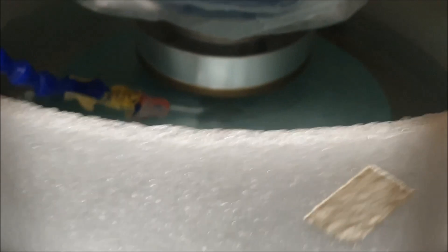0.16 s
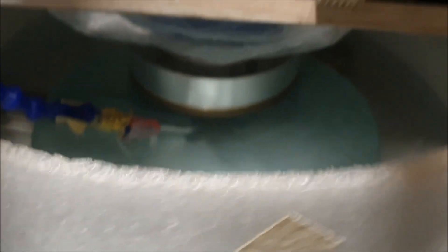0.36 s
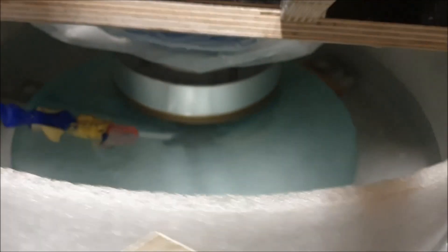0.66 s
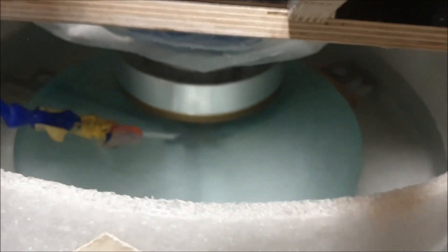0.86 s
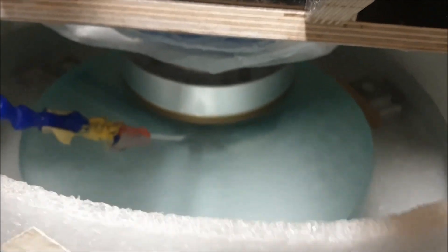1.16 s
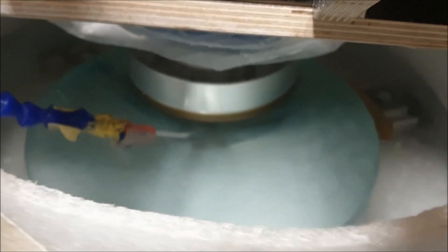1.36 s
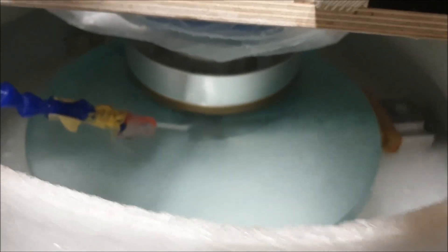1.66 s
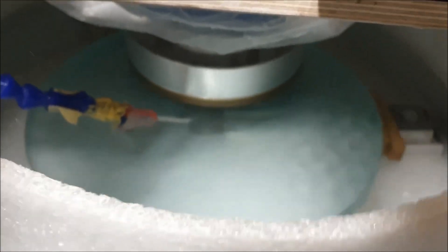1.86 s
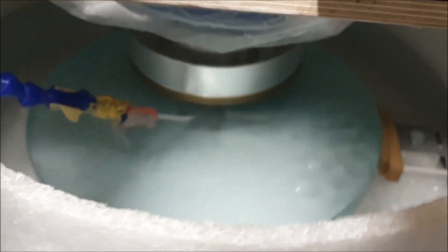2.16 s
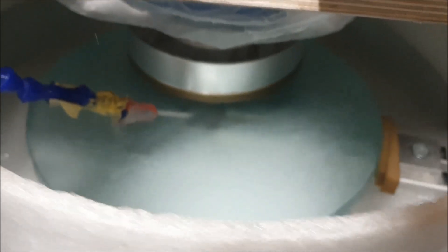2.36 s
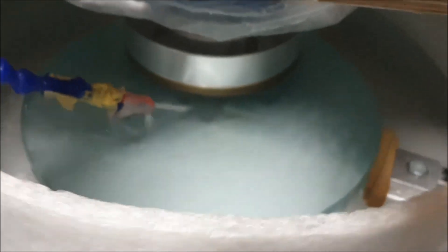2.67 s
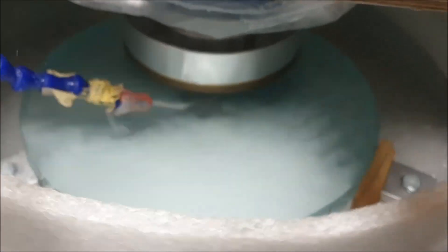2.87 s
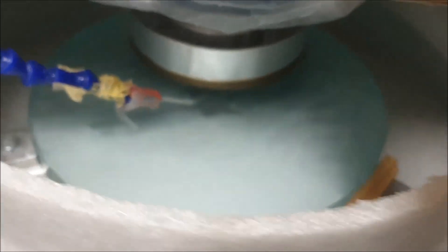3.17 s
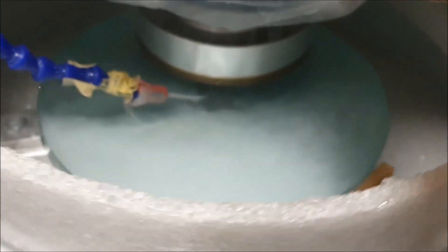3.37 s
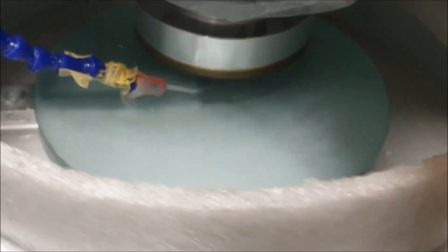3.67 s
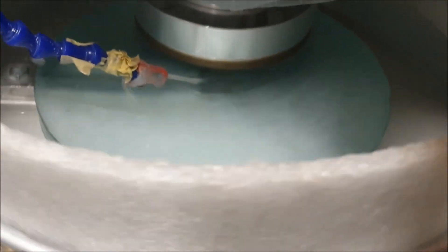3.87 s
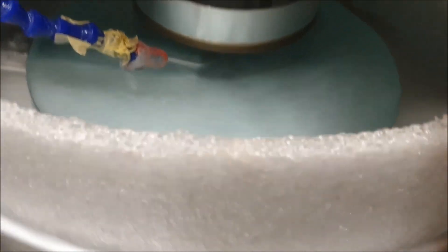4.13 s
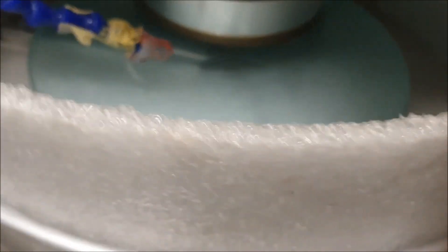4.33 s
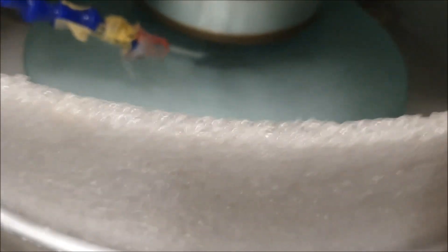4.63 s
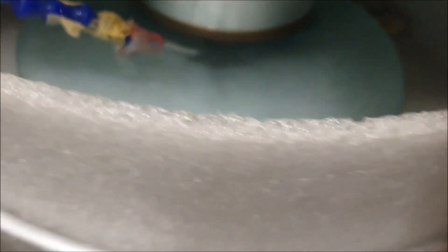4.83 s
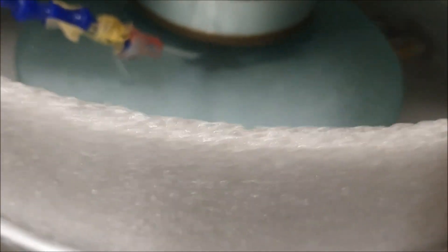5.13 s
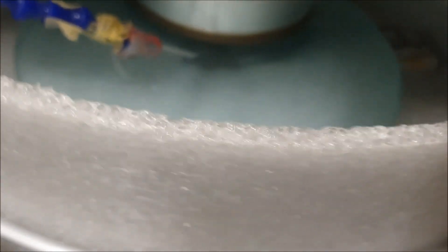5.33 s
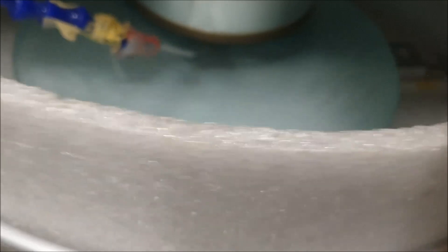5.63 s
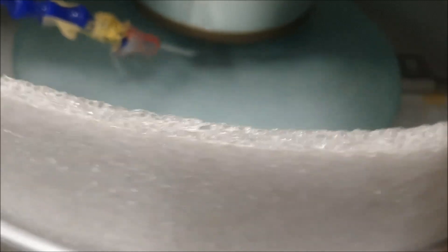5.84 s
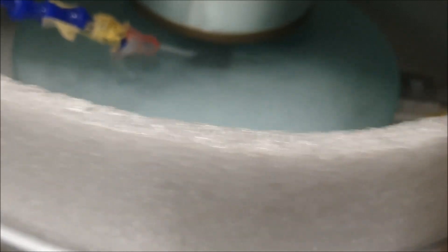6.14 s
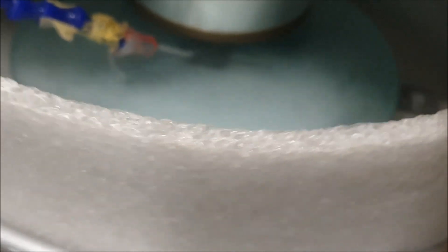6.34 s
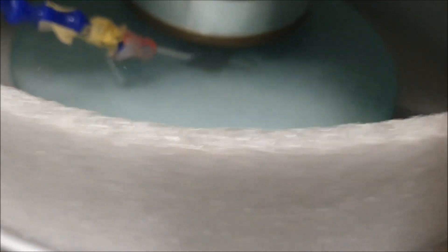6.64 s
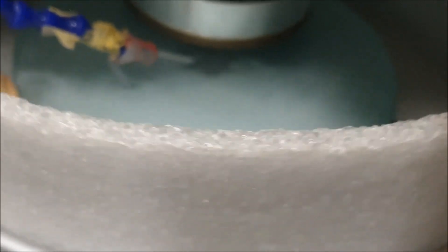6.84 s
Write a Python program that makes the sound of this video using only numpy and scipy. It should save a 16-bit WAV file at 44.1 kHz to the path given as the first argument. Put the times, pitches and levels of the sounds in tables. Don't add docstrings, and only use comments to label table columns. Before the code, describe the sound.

Close to a foam-walled tub, a spindle turns a grinding wheel against wet glass. A continuous low hum carries rapid knocks that blur into a rough buzz, with gritty hiss and metallic ringing. Irregular ticks come first, heavier thuds near two and a half seconds, drier clacking follows, then the load eases around five seconds and the rattle returns. A thin high whine stays on the left.

```python
import sys
import numpy as np
from scipy import signal
from scipy.fft import rfft, irfft
from scipy.io import wavfile
from scipy.ndimage import uniform_filter1d

SR = 44100
rng = np.random.default_rng(int(sys.argv[2]) if len(sys.argv) > 2 else 0)


def volts_from_decibels(level):
    exponent = np.asarray(level, float) / 20
    return 10 ** exponent


def log_audio(samples):
    frames = np.atleast_2d(samples).T
    limited = np.clip(frames, -1, 1)
    pcm = np.round(limited * 32767).astype(np.int16)
    wavfile.write(sys.argv[1], SR, pcm)


N = 308700
TIME = np.arange(N) / SR

# (start s, end s)
PRESS, COAST, LIFT, RETURN = (2.16, 2.83), (3.9, 5), (4.98, 5.34), (5.35, 8)
# (press_db, coast_db, lift_db, return_db)
PART_RESPONSE = [(0.28, (0.1, 1.3), (1.5, -0.5, -8.5, 2.5)), (0.22, (-6.5, 12.4), (0, 1.5, -5, 3.5)),
                 (0.17, (-8, 13), (0.5, -0.5, -14, 1.5)), (0.043, (-9, 4.1), (1, 4.5, 0, 3)),
                 (0.11, (-4, 6), (-2, -1, -17, 5)), (1, (.1, 0), (-3, 4.7, 1.5, -1)), (0.4, (-8, 6),
                 (-7, 11.5, -10, 7.5))]


def curves(table):
    s, *columns = np.transpose(table)
    return [np.interp(TIME, s, c) for c in columns]


def unit(x):
    return x / np.sqrt(np.mean(x ** 2))


def ring(x, hz, width_hz):
    return signal.lfilter(*signal.iirpeak(hz, hz / width_hz, SR), x)


def pan(db):
    return volts_from_decibels(np.array([[db], [-db]]) / 2)


def walk(rate):
    hold = int(SR / rate)
    steps = np.repeat(rng.standard_normal(N // hold + 1), hold)
    return 0.59 * uniform_filter1d(uniform_filter1d(steps, hold), hold)[:N]


def spell(start_s, end_s):
    return np.clip(np.minimum(TIME - start_s, end_s - TIME) / 0.25 + .5, 0, 1)


def spells():
    return np.array([spell(*s) for s in (PRESS, COAST, LIFT, RETURN)])


def swells(rows):
    return sum(db * spell(start_s, end_s) for start_s, end_s, db in rows)


def echoed(db, drift_db, share, cycle_s, null_s):
    share = min(share, .95)
    power = 1 + share ** 2 - 2 * share * np.cos(2 * np.pi * (TIME - null_s) / cycle_s)
    return db + drift_db * (TIME - TIME.mean()) + 10 * np.log10(power)


def hum(turns, cut):
    multiples = (2, 3, 4, 5, 6, 7, 8, 9, 10, 12)
    # level_db, drift_db_per_s, echo_share [0-1], cycle_s, null_s
    hum_echo = [(-55.21, 0.03, 0.21, 3.23, 1.7), (-56.34, 0.25, 0.45, 6.62, 0.28),
                (-53.4, 2.09, 0.93, 4.62, 3.5), (-60.07, -3.08, 0.26, 1.95, -0.46),
                (-61.8, -4.0, 0.53, 5.43, 1.08), (-60.37, -1.13, 0.5, 2.88, -0.4),
                (-57.61, 2.42, 0.47, 2.32, 2.67), (-51.52, -2.54, 0.46, 6.85, 3.22),
                (-64.93, -1.84, 0.47, 2.03, -0.41), (-59.18, 3.1, 0.48, 1.9, 1.12)]
    # press_db, coast_db, lift_db, return_db
    hum_response = [(-1.9, 1.9, 2.7, 1.6), (-3.6, 0.6, -8.8, -9.9), (5.9, -3.0, -12.8, -7.1),
                    (1.5, -7.7, 13.7, 20.0), (0.4, 2.8, 0.4, 18.0), (-3.3, 2.5, 2.9, -1.0),
                    (1.8, -5.5, -10.2, -19.0), (5.4, 5.1, -4.6, 4.4), (-8.2, -4.7, 6.5, 10.6),
                    (3.5, -3.1, -11.0, -9.7)]
    # multiple, start_s, end_s, level_db
    singing = [(12, -1, .6, -58), (15, .6, 1.7, -61), (27, 1.25, 1.7, -53), (16, .4, 1.8, -63),
               (25, .45, 1.15, -56), (25, 1.5, 2.15, -51), (26, -1, 1, -58), (26, 1.5, 2.5, -55),
               (22, 3.3, 3.9, -58), (22, 5.9, 8, -56.5), (24, 5.45, 6.2, -50.5), (32, 6.05, 8, -53.5),
               (36, 6.3, 8, -60), (37, 6.1, 8, -56)]
    # multiple, level_db
    weak = [(11, -61), (13, -79)]
    lines = []
    for k, row, response_db in zip(multiples, hum_echo, hum_response):
        lines.append((k, echoed(*row) + np.array(response_db) @ cut))
    for k, start_s, end_s, db in singing:
        present = uniform_filter1d(spell(start_s, end_s), SR // 3)
        lines.append((round(k), db - 30 * (1 - present) ** 2))
    for k, db in weak:
        lines.append((round(k), db + 3 * walk(1.9)))
    tone = 0
    for k, db in lines:
        lag_rad = 0.35 * np.outer([.5, -.5], walk(0.97))
        phase = 2 * np.pi * (k * turns + rng.random()) + lag_rad
        tone = tone + volts_from_decibels(db + 0.4 * walk(11)) * np.sin(phase)
    return np.sqrt(2) * tone * pan(-0.7)


def frame_db(cut):
    # level_db, drift_db_per_s, echo_share [0-1], cycle_s, null_s
    part_echo = [(-48, 0.061, 0.025, 4.9, 1.1), (-48, -0.58, 0.053, 10, 5.9), (-51, -0.47, 0.4, 4.26, 4.98),
                 (-55, -0.56, 0.2, 2.76, 5.04), (-58, -0.14, 0.25, 8.8, 2.7), (-44, -0.25, 0.027, 6.7, 2.3),
                 (-67, 0.55, 0.22, 4.6, 0.86)]
    # time_s, level_db
    bite = [(0, -4), (.3, -7), (1.5, 0.2), (1.85, -8.5), (2.1, -4), (2.16, 3.5), (2.42, 5.5), (2.6, -2.5),
            (2.9, 2.5), (3.6, 5.5), (4.2, -4), (4.65, -16.5), (4.9, -10), (5.15, -7), (5.7, -5), (6.5, 4.5),
            (7, 2)]
    bite_db = curves(bite)[0]
    levels_db = []
    for row, (share, _, response_db) in zip(part_echo, PART_RESPONSE):
        levels_db.append(echoed(*row) + share * bite_db + np.array(response_db) @ cut)
    return levels_db


def knocks(turns, parts_db):
    # time_s, second_knock_after [turns], second_minus_first_db, low_late [turns], middle_late [turns]
    play = [(0, 0.49, -4, -.06, -0.019), (.9, 0.36, -17, -.08, -0.014), (1.3, .33, 3, -0.12, -0.065),
            (1.38, .33, 2, -.1, 0.092), (1.7, 0.28, 3.5, -.25, 0.035), (2.05, 0.19, 2.5, -0.27, -0.086),
            (2.13, 0.42, 5, -0.01, -.08), (2.45, 0.076, 10, -0.012, -0.052),
            (2.6, 0.22, -8, 0.0048, -0.035), (3.2, 0.21, 0, -0.0041, 0.013), (3.5, 0.2216, -4, 0.0054, .17),
            (4.2, 0.2473, -5, .1, 0.192), (4.8, 0.255, -8, .14, 0.1695), (5.3, 0.55, -17, -0.12, -0.044),
            (5.6, 0.54, -1.5, -.14, .08), (6.2, 0.65, -6.5, -.11, .14), (7, 0.7, -1, -0.129, 0.089)]
    # time_s, peak_db
    knock_peaks = [(0.029, -33.5), (0.065, -34), (0.139, -30.5), (0.249, -32.5), (0.323, -35), (0.36, -34),
                   (0.434, -32.5), (0.471, -35.5), (0.508, -32), (0.546, -36), (0.605, -35), (0.656, -36),
                   (2.285, -36), (2.328, -34.5), (2.397, -31), (2.507, -27), (2.618, -27.5), (2.691, -34),
            (2.727, -34), (2.801, -30.5), (2.837, -36), (2.873, -32.5), (2.91, -32.5), (2.945, -38),
            (2.983, -33), (3.018, -34.5), (3.091, -29.5), (3.199, -31), (3.235, -32), (3.272, -32),
            (3.308, -33.5), (3.344, -31), (3.417, -32), (3.488, -30.5), (3.524, -33), (3.56, -31),
            (3.596, -33), (3.632, -34.5), (3.667, -32), (3.705, -32.5), (3.741, -35.5), (3.777, -37),
            (3.813, -37), (3.849, -35), (3.886, -34.5), (3.922, -36), (3.958, -39), (4.03, -33),
            (4.066, -35), (4.102, -33), (4.138, -31), (4.174, -31), (4.21, -31.5), (4.246, -32),
            (4.282, -32), (4.319, -35), (4.355, -31), (4.391, -30), (4.427, -33.5), (4.462, -34),
            (4.499, -28), (4.535, -32), (4.608, -28), (4.644, -29), (4.68, -32), (4.715, -34), (4.752, -35),
            (4.862, -36.5)]
    # modes (hz, width_hz, level_db), left_minus_right_db, left_lag_s, scrape_share [0-1]
    frame = [
        ([(484, 36, 13.5), (523, 83, 9.5)], -8.5, 0, 0.053),
        ([(609.3, 25, 10.5), (692.3, 64, 7.5), (747, 153, 4), (569.7, 35, 1)], -0.46, .0001, 0.48),
        ([(866, 80, -1), (1054, 61, 9.5), (1145, 48, 11.5), (1215, 92, 5)], -8, 0.00226, 0.6),
        ([(1380, 340, 5.5), (1880, 175, 3.5), (2570, 260, -2)], -14, 0.00173, 0.6),
        ([(1540, 60, 0)], -8.5, 0.00096, 0.071),
        ([(448.2, 14.8, -0.5), (469.2, 23, -1.1)], -0.36, 0, 0.23),
        ([(900, 154, 10.5), (1700, 1500, -13.5)], -16.5, 0.00041, .02),
    ]
    scatter_db, contact_s, scrape_decay_s = .8, .00015, 0.0096
    after, second_db, low_late, middle_late = curves(play)
    harder_db = sum(np.clip(0.72 * (db + 35.5), -5, 8) * (abs(TIME - s) < .011) for s, db in knock_peaks)
    shared_db = scatter_db * rng.standard_normal((2, N // 200))
    out = 0
    for (modes, pan_db, lag_s, rough), db, (_, extra_db, _) in zip(frame, parts_db, PART_RESPONSE):
        lowest_hz = modes[0][0]
        late = low_late if lowest_hz < 550 else middle_late if lowest_hz < 800 else 0
        part_second_db = second_db + extra_db[0] + extra_db[1] * spell(*RETURN)
        blows = np.zeros(N)
        for angle, size_db, shared in zip((late, after), (harder_db, part_second_db), shared_db):
            turn = np.floor(turns - 0.075 - angle + 2)
            at = np.flatnonzero(np.diff(turn) > 0)
            own_db = scatter_db * rng.standard_normal(N // 200)[:len(at)]
            blows[at] += volts_from_decibels(size_db[at] + shared[turn[at].astype(int)] + own_db)
        blows = uniform_filter1d(blows, round(contact_s * SR))
        scrape_envelope = signal.lfilter([1], [1, -np.exp(-1 / (scrape_decay_s * SR))], blows)
        scrape = scrape_envelope * rng.standard_normal((2, N))
        drive = np.array([np.roll(blows, int(lag_s * SR)), blows]) + .1 * min(rough, .24) * scrape
        part = sum(volts_from_decibels(g) * ring(ring(drive, hz, 2.1 * width_hz), hz, width_hz) for hz, width_hz, g in modes)
        even = np.sqrt(uniform_filter1d(np.mean(part ** 2, axis=0), SR // 3) + 1e-12)
        out = out - volts_from_decibels(db - 3.0) * part / even * pan(pan_db)
    return out


def contacts():
    # time_s, peak_db
    ticks = [(0.0283, -46), (0.0648, -38), (0.0648, -35), (0.1012, -47), (0.1381, -48), (0.1989, -36),
             (0.2359, -33), (0.2508, -46), (0.2853, -40), (0.3227, -34), (0.3596, -41), (0.3835, -35),
             (0.4334, -41), (0.4703, -36), (0.5072, -37), (0.5816, -34), (0.605, -32.5), (0.6424, -38),
             (0.6589, -33), (0.6823, -47), (0.7163, -33.5), (0.7532, -45), (0.7692, -40), (0.7901, -38),
             (0.8275, -35.5), (0.8445, -38), (0.8639, -47), (0.8769, -42), (0.9018, -37), (0.9383, -34),
             (0.9757, -41), (1.0495, -35), (1.062, -45), (1.0879, -39), (1.1243, -37), (1.1368, -47),
             (1.1972, -43), (1.2141, -45), (1.2346, -38), (1.3089, -42), (1.3453, -36), (1.3838, -46),
             (1.3982, -50), (1.4192, -45), (1.4551, -39), (1.5095, -35), (1.5693, -42), (1.6043, -41),
             (1.6267, -39)]
    thuds = [(2.58, -25), (2.619, -27), (2.692, -21.5), (2.728, -29), (2.764, -37), (2.801, -19),
             (2.838, -31), (2.874, -23), (2.911, -21), (2.946, -25), (2.982, -23), (3.018, -27),
             (3.055, -24), (3.091, -34), (3.127, -27), (3.164, -27), (3.2, -30), (3.236, -41), (3.272, -25),
             (3.307, -37)]
    clacks = [(3.3078, -42), (3.3437, -36), (3.4161, -39), (3.451, -42), (3.4884, -35), (3.5248, -37),
              (3.5967, -38), (3.6326, -45), (3.7049, -48), (3.7403, -45), (3.7772, -31.5), (3.8132, -35),
              (3.8496, -42), (3.8855, -41), (3.9214, -44), (3.9578, -36), (3.9933, -49), (4.0297, -36),
              (4.0661, -43), (4.102, -38), (4.1384, -39), (4.1743, -36), (4.2103, -30.5), (4.2462, -37),
              (4.2826, -28.5), (4.319, -32), (4.3544, -44), (4.3909, -29.5), (4.4268, -30), (4.4632, -41),
              (4.4991, -30.5), (4.535, -34.5), (4.5704, -42), (4.6079, -32), (4.6433, -30), (4.6797, -34),
              (4.7156, -39), (4.7515, -29.5), (4.7879, -38)]
    raps = [(6.146, -36), (6.182, -39), (6.218, -36), (6.254, -35), (6.291, -42), (6.328, -34),
            (6.363, -34), (6.399, -39), (6.434, -33), (6.473, -34), (6.507, -33), (6.544, -35),
            (6.579, -32), (6.616, -39), (6.652, -35), (6.686, -33), (6.725, -36), (6.76, -33), (6.795, -32),
            (6.829, -35), (6.867, -38), (6.903, -40), (6.939, -35), (6.975, -36)]
    taps = [(5.6678, -41), (5.7027, -45), (5.7366, -45), (5.7882, -41), (5.811, -36), (5.8464, -41),
            (5.8599, -41), (5.8858, -45), (5.919, -35), (5.9546, -41), (5.9676, -34), (5.9901, -38),
            (6.0255, -48), (6.0624, -34), (6.0988, -51), (6.1332, -41), (6.15, -32.5), (6.1701, -37),
            (6.2061, -40), (6.2425, -41), (6.2564, -36), (6.278, -41), (6.3143, -46), (6.326, -41),
            (6.3502, -40), (6.3632, -38), (6.3867, -44), (6.3991, -41), (6.4226, -37), (6.435, -43),
            (6.4585, -42), (6.472, -41), (6.4949, -42), (6.5318, -45), (6.5682, -40), (6.6042, -44)]
    chirps = [(0.6402, -56), (0.6762, -54), (0.7156, -48), (0.7545, -57), (0.7884, -50), (0.8263, -44),
              (0.8627, -47), (0.8996, -59), (0.9435, -54), (0.9745, -52), (1.012, -54), (1.0483, -50),
              (1.1241, -58), (1.1581, -47), (1.2723, -56), (1.3062, -51)]
    rattles = [(2.101, -38), (2.138, -35), (2.175, -43), (2.212, -41), (2.286, -37), (2.328, -34),
               (2.364, -39), (2.397, -36), (2.433, -46), (2.467, -41), (2.507, -38), (2.541, -48)]
    # modes (hz, level_db, t60_s), rise_s, usual_peak_db, offset_db, left_minus_right_db
    kinds = [
        ([(1456, 5.5, 0.026), (1880, -2.5, 0.061), (780, 1.5, 0.06)], 0.0015, -39, -4, -4.5),
        ([(464, -0.5, .045), (700, -0.5, .035), (1114, -2.5, 0.037)], 0.00085, -20, -10, -1),
        ([(1569, -1.5, 0.032), (1810, -10.5, 0.046), (2470, -7, 0.021)], .0008, -30, -6, -11.5),
        ([(883, 6, 0.013), (1037, 0, 0.026), (1184, 0, 0.017)], 0.0017, -34, -6.5, -17),
        ([(1620, 5, 0.026), (1980, -5, .025)], .001, -38, -5.5, -13),
        ([(3680, 0, 0.043)], 0.0032, -49, -3.5, -18),
        ([(1152, 3, 0.034), (1014, -4, 0.033)], .0013, -35, -8, -12),
    ]
    contrast, detune = 1.15, .025
    age = np.arange(4410) / SR
    out = np.zeros((2, N + 4410))
    events = (ticks, thuds, clacks, raps, taps, chirps, rattles)
    for rows, (modes, rise_s, usual_db, offset_db, pan_db) in zip(events, kinds):
        chance = rng.standard_normal((60, 3))
        for (s, db), off in zip(rows, chance):
            tone = 0
            for (hz, g, t60), d in zip(modes, off):
                pitch_hz = hz * (1 + detune * np.sqrt(500 / hz) * d)
                tone = tone + volts_from_decibels(g - 60 * age / t60) * np.sin(2 * np.pi * pitch_hz * age)
            tone = tone * (1 - np.exp(-age / abs(rise_s))) ** 2
            at = int(max(s, 0) * SR)
            peak_db = usual_db + offset_db + contrast * (db - usual_db)
            out[:, at:at + len(age)] -= volts_from_decibels(peak_db) * tone / abs(tone).max() * pan(pan_db)
    return out[:, :N]


def wheel(turns, modes, ring_db, throb_db):
    grit = volts_from_decibels(2.4 * walk(35) + throb_db * np.cos(2 * np.pi * (turns - .25)))
    shared, out = rng.standard_normal(N), 0
    for hz, width_hz, db, pan_db, drift_db in modes:
        drive = grit * (1.25 * shared + rng.standard_normal((2, N)))
        level_db = db + drift_db * (TIME - TIME.mean()) + .8 * walk(2.58)
        tone = unit(ring(ring(drive, hz, 3 * width_hz), hz, width_hz))
        out = out + volts_from_decibels(level_db) * tone * pan(pan_db)
    return volts_from_decibels(ring_db) * out


def hiss(turns, hiss_db, rattle_db):
    # frequency_hz, level_db_per_hz
    left_port = [(45, -87), (150, -94.5), (700, -86), (1400, -90), (2100, -91.5), (2980, -88), (4000, -91),
                 (7550, -85.5), (8100, -99), (9000, -90.5), (10300, -87.5), (11800, -89.5), (13900, -83.5),
                 (14800, -89.5)]
    right_port = [(45, -76.5), (150, -71.5), (700, -84), (1400, -81.5), (2250, -79.5), (4100, -86),
                  (6000, -86), (7600, -104.5), (8100, -118), (9300, -101), (10300, -95.5), (11900, -97.5),
                  (14100, -92.5), (15300, -106)]
    hz = np.maximum(np.fft.rfftfreq(N, 1 / SR), 1)
    ports_db = []
    for port in (left_port, right_port):
        port_hz, port_db = np.transpose(port)
        ports_db.append(np.interp(np.log(hz), np.log(port_hz), port_db))
    colour = volts_from_decibels(np.array(ports_db)) / np.sqrt(1 + (30 / hz) ** 8)
    alike = 1 / (1 + (hz / 800) ** 3)
    mid, left, right = rfft(rng.standard_normal((3, N)))
    field = np.sqrt(alike) * mid + np.sqrt(1 - alike) * np.array([left, right])
    both = colour * field * np.sqrt(SR / 2)
    throb_db = 0.94 * np.cos(2 * np.pi * (turns - .25)) + 0.61 * walk(40)
    step, out = np.log2(hz / 40) * 2, 0
    for k in range(19):
        treble = np.clip((k - 9) / 4, 0, 1)
        middle = np.exp(-((k - 9) / 0.37) ** 2)
        band = irfft(both * np.cos(np.pi / 2 * np.clip(step - k, -1, 1)) ** 2, N)
        db = treble * (hiss_db - hiss_db.mean() + throb_db) + 0.76 * middle * (rattle_db - rattle_db.mean())
        out = out + band * volts_from_decibels(db + 0.51 * walk(15))
    return out


def whine(whine_db):
    # pitch_hz, wander_hz, level_db
    side_tones = [(9222, 30, -71), (11779, 8, -78), (12645, 25, -76)]
    tone = volts_from_decibels(whine_db + 1.2 * walk(13)) * np.sin(2 * np.pi * np.cumsum(12210 + 3.4 * walk(8.3)) / SR)
    for hz, wander_hz, db in side_tones:
        phase = 2 * np.pi * np.cumsum(hz + wander_hz * walk(49)) / SR
        tone = tone + volts_from_decibels(db + 1.6 * walk(7.4)) * np.sin(phase)
    return 1.08 * tone * np.array([[1], [volts_from_decibels(-13)]])


def scene():
    # time_s, speed_hz
    speed = [(0, 27.117), (.5, 27.002), (1.05, 27.046), (1.4, 27.018), (1.75, 26.819), (2.1, 27.13),
             (2.45, 27.115), (2.8, 27.433), (3.15, 27.721), (4, 27.693), (4.55, 27.655), (4.9, 27.718),
             (5.25, 28.027), (5.7, 28.116), (6.3, 27.758), (7, 27.822)]
    # level_db, drift_db_per_s, echo_share [0-1], cycle_s, null_s
    grind_echo = [(-50, 0.097, 0.076, 1.63, 2), (-62, 0.94, 0.59, 2.03, 2.39), (-59, 1, 0.23, 1.18, 2)]
    # pitch_hz, width_hz, level_db, left_minus_right_db, drift_db_per_s
    wheel_modes = [(2490, 130, -12, -12, -5), (2580, 67, 2.5, -12, -1), (2691, 59, 0, -21.5, 0.2),
                   (2761, 64, 1.5, -8, -0.5), (3158, 134, -6.5, -22, 0.5)]
    rim_modes = [(3677, 60, 0, -19.5, 0)]
    plate_modes = [(1683, 47, 0, -11, 0)]
    clear_modes = [(2560, 21, -0.27, -22, 0), (2720, 21, -1.1, -8, 0)]
    # start_s, end_s, change_db
    ring_swells = [
        (0, 0.11, -2.5),
        (2, 1.4, -9),
        (5, 6.15, -1),
    ]
    rim_swells = [
        (.6, 1.4, -8),
        (.95, 1.4, 0),
        (1.2, 1.7, -4),
        (4.3, 4.7, 8),
        (4.85, 5.2, 5),
        (5.75, 8, -9),
    ]
    # time_s, level_db
    plate_level = [
        (0, -56.5),
        (1.9, -63),
        (2.3, -60),
        (3.5, -57),
        (3.9, -56.5),
        (5.6, -68),
        (6.1, -59),
        (7, -68),
    ]
    clear_level = [(0, -75), (.6, -80), (.72, -60), (1.0, -58.5), (1.35, -57.5), (1.5, -63.5), (1.9, -67),
                   (2.1, -64.5), (2.4, -58), (2.6, -67), (7, -80)]
    turns = .29 + np.cumsum(curves(speed)[0]) / SR
    ring_db, rim_db, whine_db = (echoed(*row) for row in grind_echo)
    wall_start_s, wall_end_s = 4.12, 6.22
    behind = spell(wall_start_s, wall_end_s)
    ring_db = ring_db + 2.5 * behind + swells(ring_swells)
    rim_db = rim_db + swells(rim_swells)
    hidden_db = -48.5 - 2 * (TIME - wall_start_s)
    whine_db = whine_db + uniform_filter1d(behind, SR // 3) * (hidden_db - whine_db)
    metal = wheel(turns, wheel_modes, ring_db - 10.5, 1.1)
    metal = metal + wheel(turns, rim_modes, rim_db - 4.5, 7 * (1 - .7 * spell(5.0, 5.7)))
    metal = metal + wheel(turns, plate_modes, curves(plate_level)[0], 1.1)
    metal = metal + wheel(turns, clear_modes, curves(clear_level)[0], 5)
    cut = spells()
    parts_db = frame_db(cut)
    grit = hiss(turns, 1.16 * behind, parts_db[2])
    return hum(turns, cut) + knocks(turns, parts_db) + contacts() + metal + grit + whine(whine_db)


def low_pass(x):
    return signal.sosfilt(signal.butter(12, 15760, fs=SR, output="sos"), x)


def record(dry):
    return low_pass(dry)


dry = scene()
out = record(dry)
log_audio(out)
```